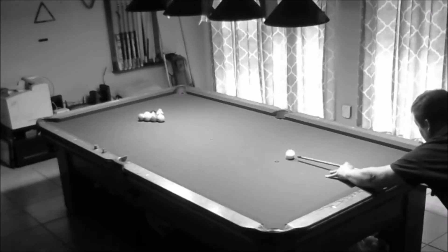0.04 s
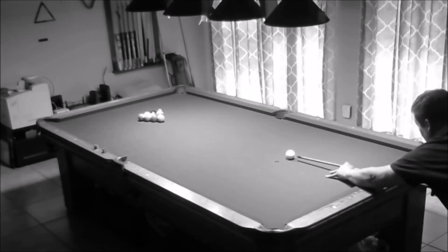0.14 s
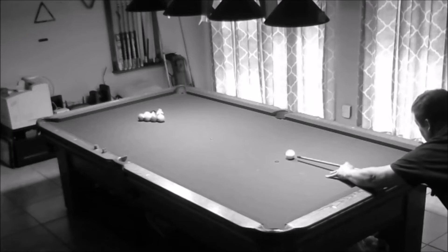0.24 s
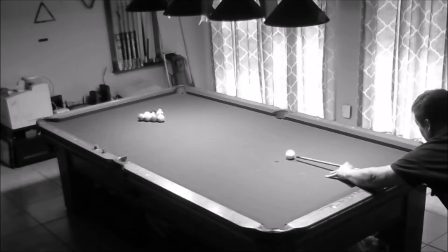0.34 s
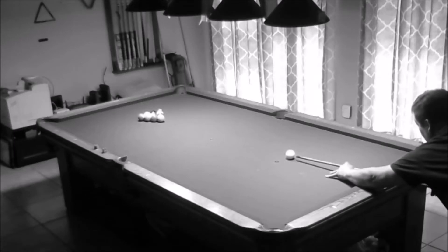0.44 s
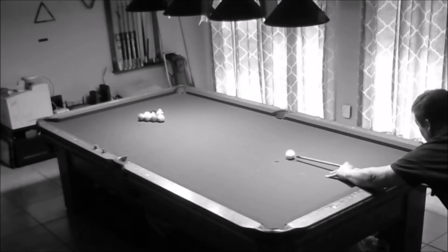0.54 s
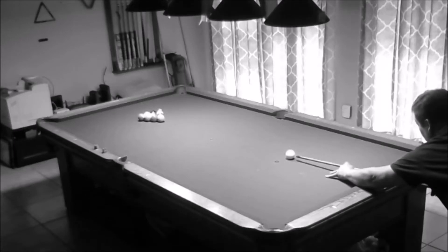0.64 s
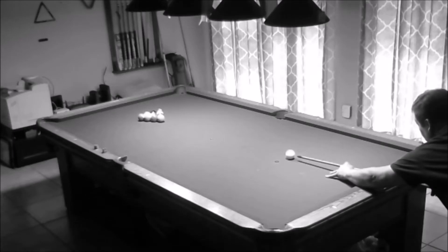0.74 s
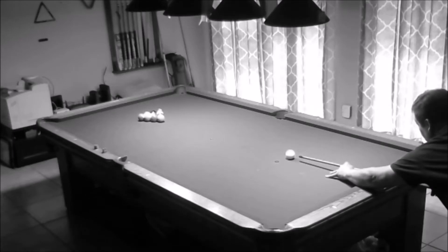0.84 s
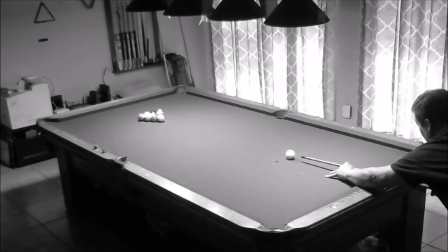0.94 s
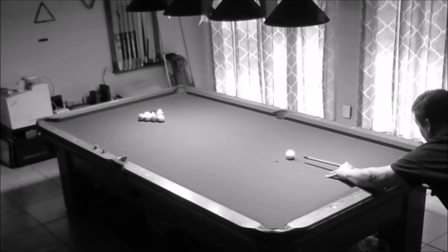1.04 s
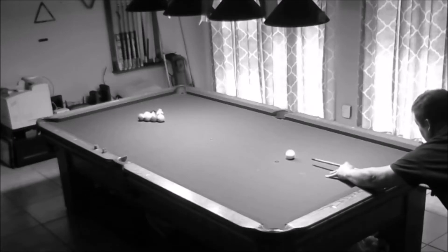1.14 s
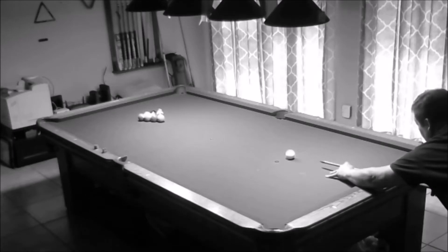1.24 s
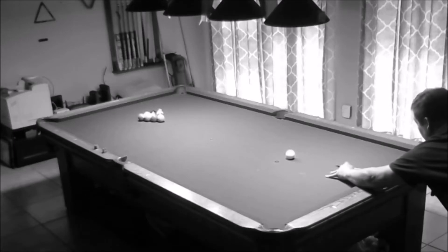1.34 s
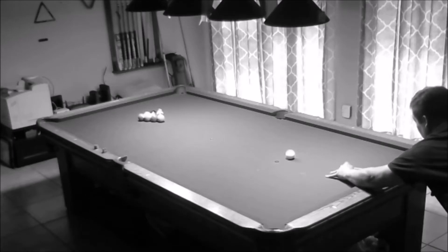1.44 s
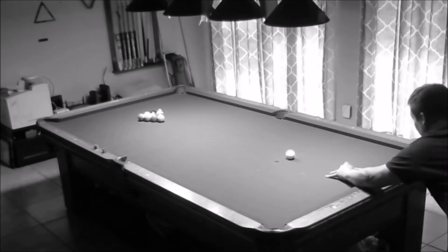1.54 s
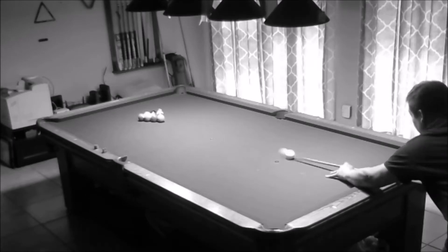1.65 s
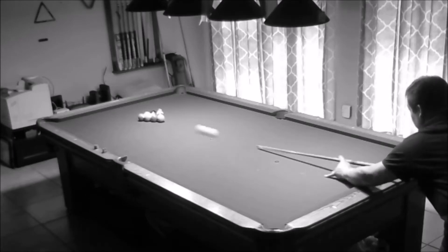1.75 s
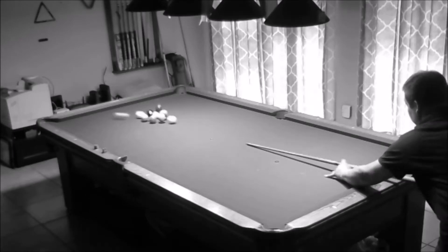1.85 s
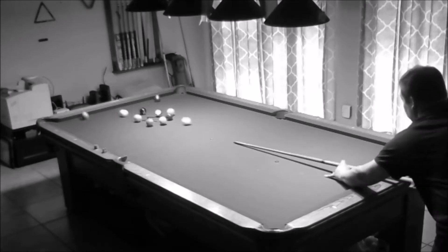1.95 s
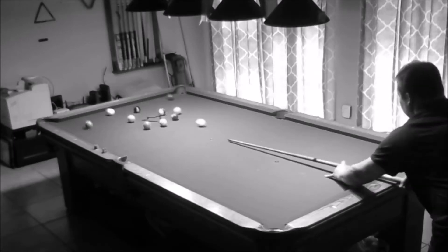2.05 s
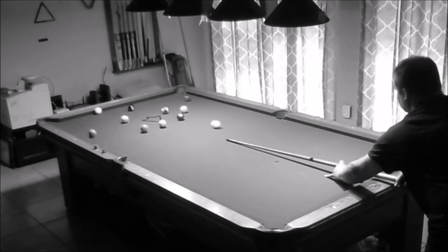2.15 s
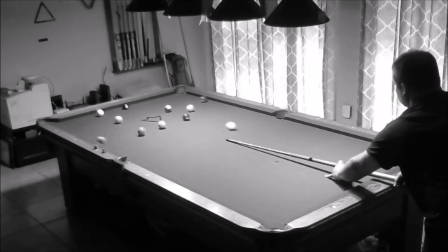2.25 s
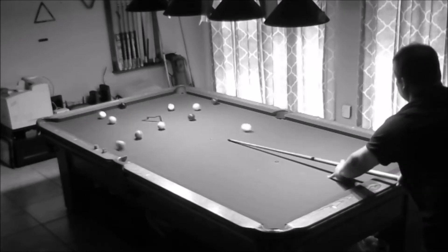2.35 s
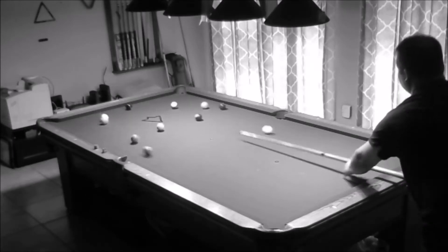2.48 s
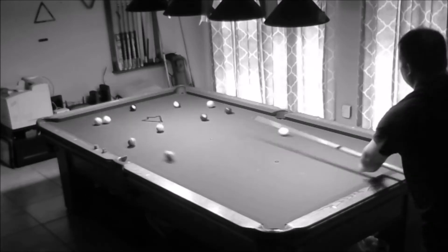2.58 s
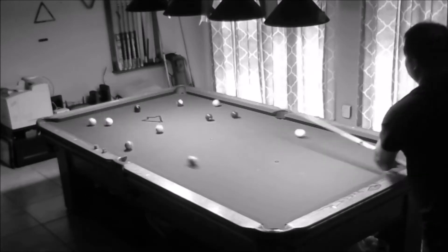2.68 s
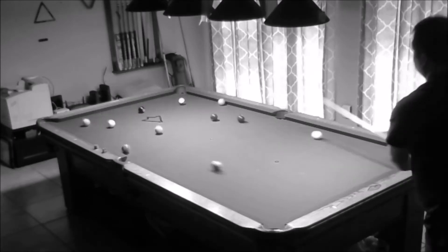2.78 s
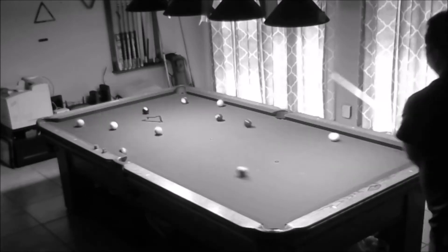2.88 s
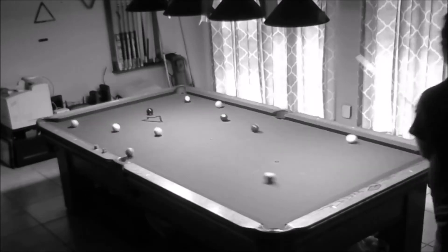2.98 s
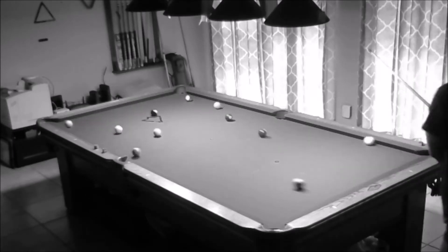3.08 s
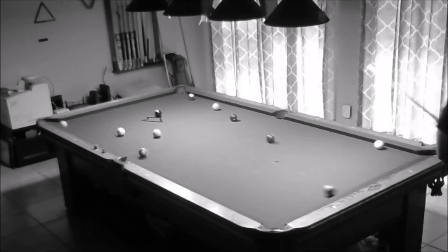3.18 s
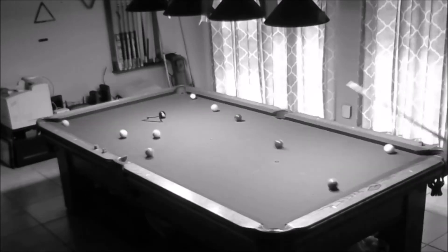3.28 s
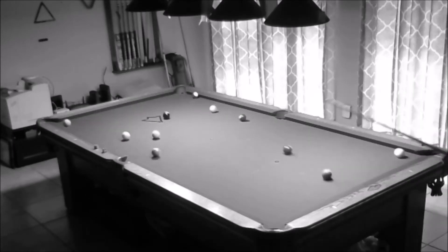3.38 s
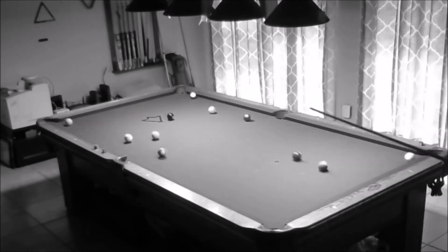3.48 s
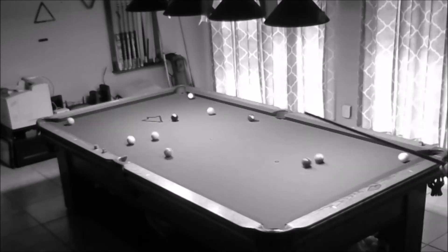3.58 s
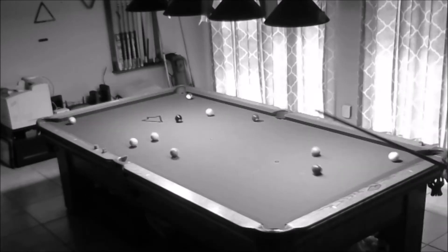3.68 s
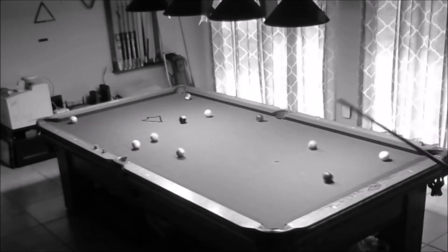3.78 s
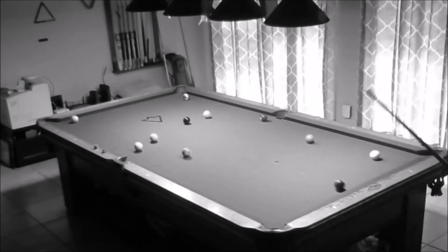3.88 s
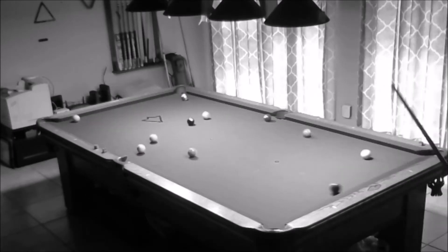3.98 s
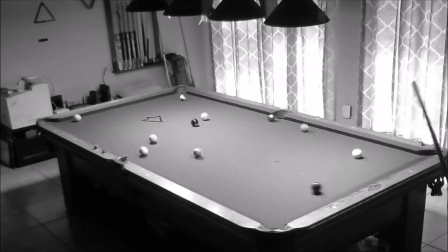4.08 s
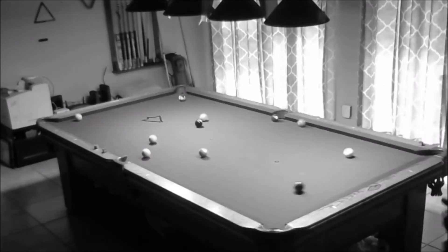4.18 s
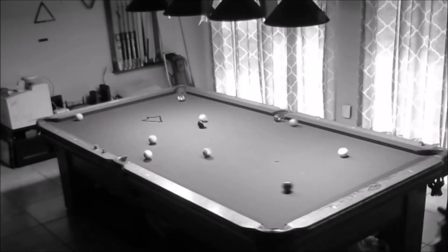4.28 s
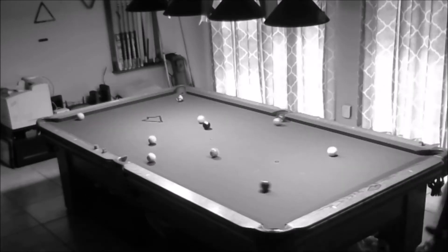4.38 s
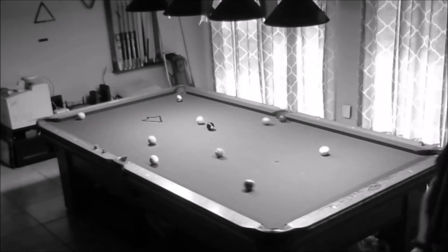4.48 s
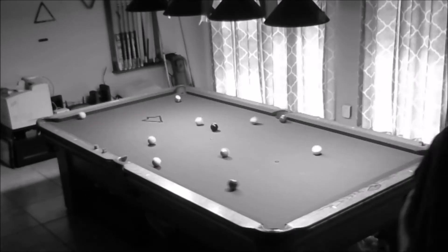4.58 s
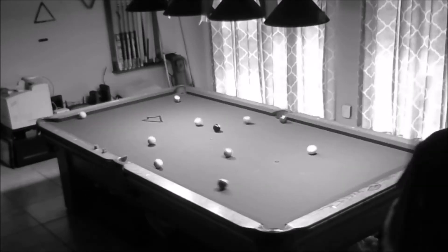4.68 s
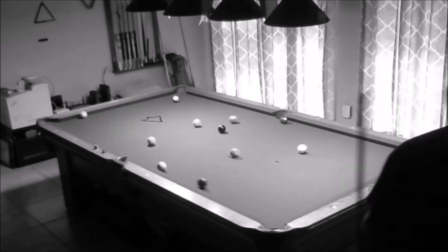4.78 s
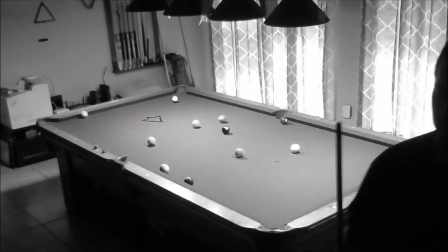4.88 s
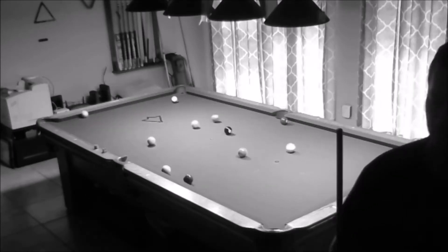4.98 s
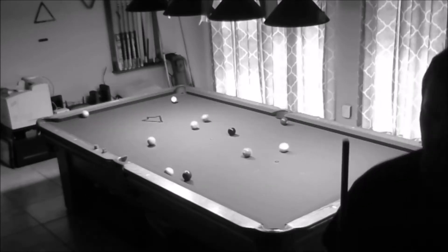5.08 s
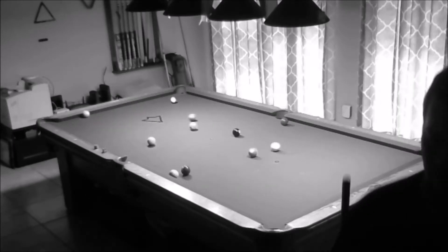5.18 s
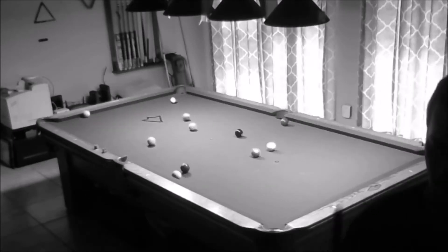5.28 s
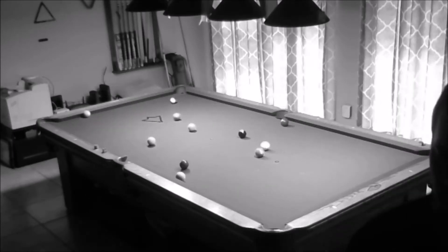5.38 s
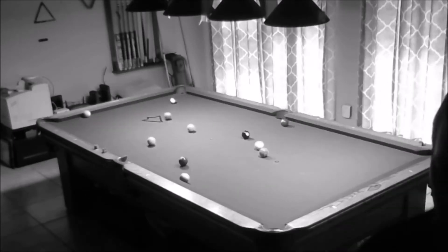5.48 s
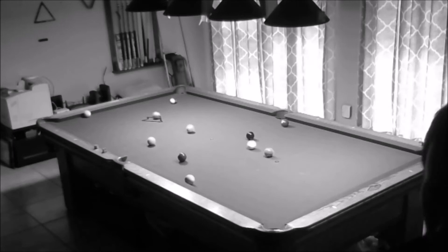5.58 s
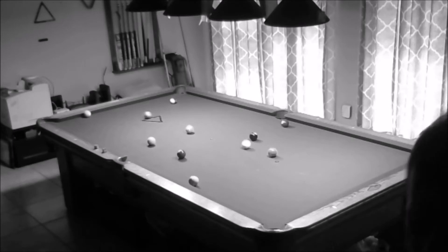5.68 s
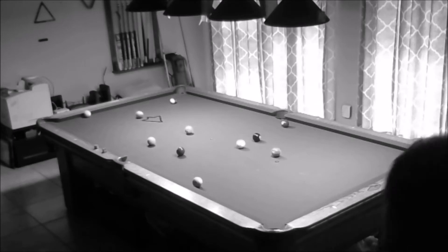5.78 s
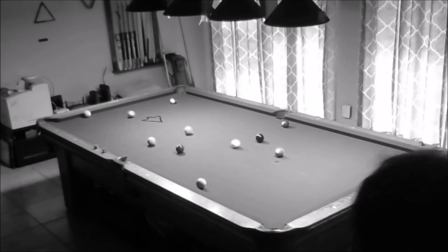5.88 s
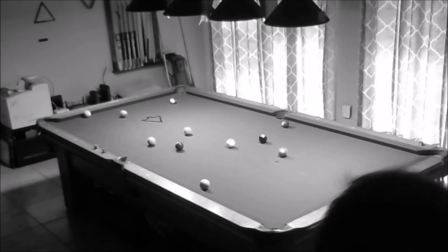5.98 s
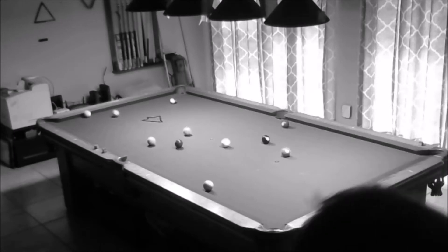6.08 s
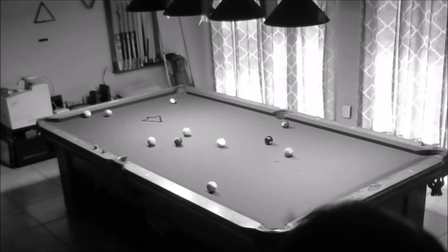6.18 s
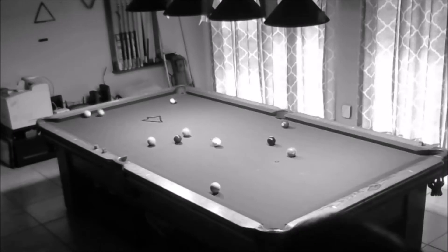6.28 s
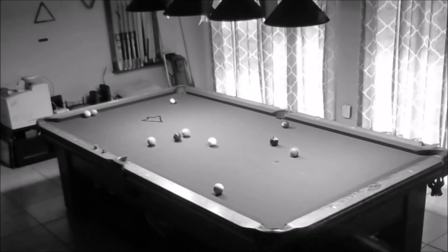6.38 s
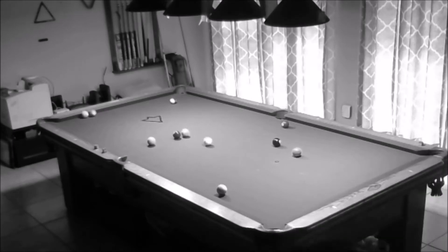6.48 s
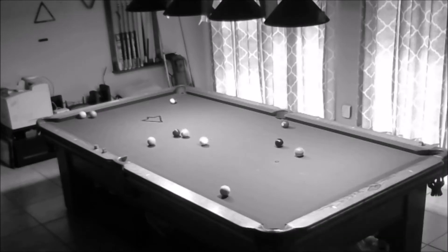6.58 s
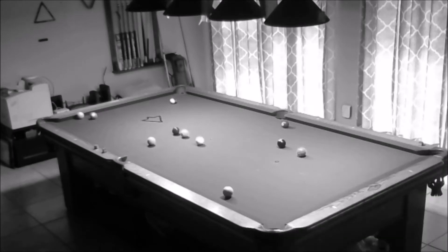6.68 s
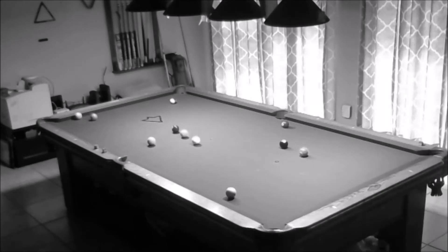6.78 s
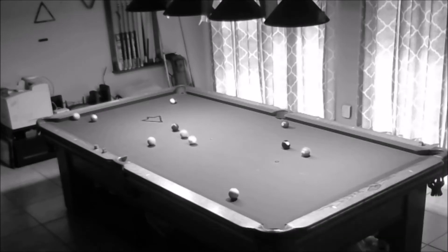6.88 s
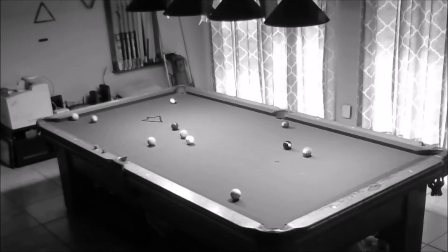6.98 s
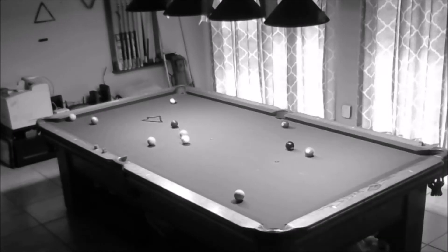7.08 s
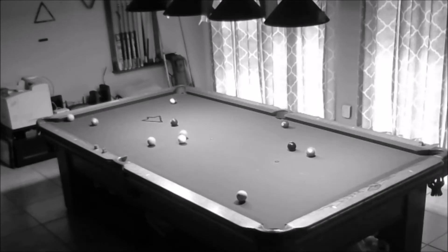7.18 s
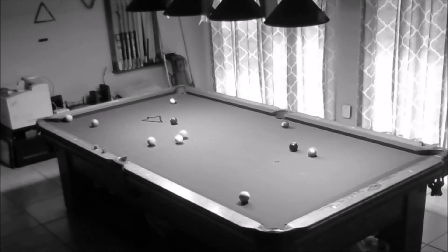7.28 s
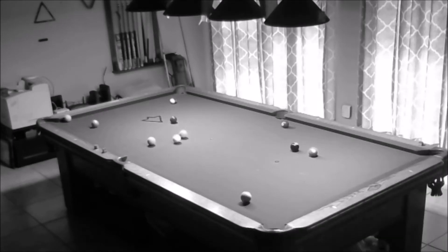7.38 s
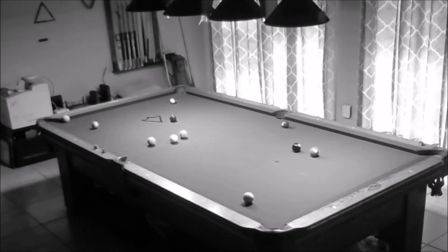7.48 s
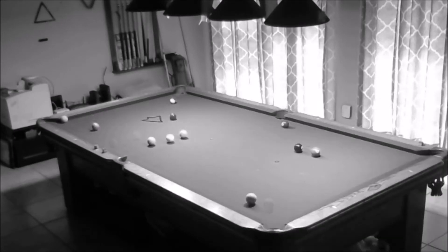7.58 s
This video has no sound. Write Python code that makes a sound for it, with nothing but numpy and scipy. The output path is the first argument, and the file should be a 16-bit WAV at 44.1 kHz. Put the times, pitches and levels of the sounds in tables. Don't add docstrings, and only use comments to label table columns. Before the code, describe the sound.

A cue strikes hard and racked pool balls burst apart in a loud distorted clack, then near-quiet with microphone flutters and a few late ball clicks.

```python
import sys
import numpy as np
from scipy import signal
from scipy.fft import rfft, irfft
from scipy.io import wavfile
from scipy.ndimage import uniform_filter1d, map_coordinates

SR = 44100
rng = np.random.default_rng(int(sys.argv[2]) if len(sys.argv) > 2 else 0)


def wav_record(signal):
    frames = np.transpose(np.atleast_2d(signal))
    bounded = np.clip(frames, -1, 1)
    quanta = np.round(bounded * 32767).astype(np.int16)
    wavfile.write(sys.argv[1], SR, quanta)


def level_to_linear(level):
    exponent = np.asarray(level, float) / 20
    return 10 ** exponent


N = 336924

# (time [s], level [dB])
CUE_BLOWS = [
    (1.6482, 3),
    (1.65, -2.5),
    (1.6602, 2),
    (1.668, -3),
    (1.6761, -3.5),
    (1.682, -2.5),
    (1.691, -2.5),
    (1.696, -7.5),
]
# (time [s], level [dB], ring [Hz], decay to -60 dB [s])
LEAD_BALL_CLACK = (1.8073, 15, 2900, 0.018)
# (time [s], level [dB])
RACK_COLLISIONS = [(1.8066, 7), (1.816, 6.5), (1.820, 6), (1.825, 4.5), (1.834, 6), (1.838, 2.5),
                   (1.844, -2.5), (1.851, 1), (1.859, -3.5), (1.865, -0.5), (1.870, -2), (1.876, -3),
                   (1.930, -11), (1.975, -14)]
# (time [s], level [dB])
CUSHION_THUDS = [(1.655, -20.5), (1.699, -25.5), (1.756, -23.5), (1.812, -20.5), (1.844, -24.5),
                 (1.922, -15.5), (1.955, -15), (1.995, -19), (2.04, -24.5), (2.065, -31.5), (2.12, -35.5)]
# (time [s], level [dB], centre [Hz], spread [octaves], share of room tail kept [0-1])
LATE_CLICKS = [(3.858, -53, 4574, 0.76, 0.42), (3.871, -51.5, 6000, 0.43, 0.52),
               (4.715, -43, 4770, 0.31, 0.03), (4.723, -49, 4560, 0.65, 0.46),
               (4.725, -57, 2900, 0.48, 0.07), (6.2017, -27.5, 3530, 1.35, 0.43),
               (6.206, -36.5, 486, 0.45, .4), (6.208, -47, 1144, 1, 0.54),
               (6.2637, -35.5, 5260, 1.23, 0.39), (6.269, -42, 422, 0.44, 0.37),
               (6.273, -52.5, 1190, 1.1, 0.32), (6.416, -61.5, 2590, 0.24, 0.63),
               (6.452, -53, 1700, 0.19, 0)]
# (time [s], level [dB], centre [Hz])
DRAUGHT_LUMPS = [
    (2.388, -55, 383),
    (3.29, -46, 379),
    (3.617, -46.5, 277),
    (5.518, -45.5, 352),
    (5.653, -50.5, 330),
    (7.03, -64, 520),
    (7.15, -62, 497),
]
# (time [s], level [dB], centre [Hz], spread [octaves], half length [s])
RUBS = [(0.435, -71, 3930, 0.18, 0.012), (1.39, -67, 6200, .3, 0.0098), (2.885, -55, 5460, 0.59, 0.013),
        (3.27, -77, 6000, 0.55, 0.026), (3.83, -62, 6010, 0.29, 0.016), (4.705, -64, 4495, 0.59, 0.0077),
        (4.78, -77, 8980, .3, .015), (5.355, -64, 6000, .4, 0.018), (5.375, -63.5, 3073, 0.27, 0.019),
        (6.195, -70, 5000, 0.48, 0.0032), (6.44, -48.5, 1906, 0.52, 0.013),
        (6.479, -56.5, 1664, 0.47, 0.024), (7.1, -69, 1200, 0.22, 0.017)]
# (time [s], level [dB], centre [Hz])
LONG_GUSTS = [
    (.11, -56, 140),
    (.47, -50, 120),
    (0.631, -41, 133),
    (1.5, -46, 150),
    (4.09, -35.5, 189.6),
    (5.13, -37.5, 90),
    (5.911, -44.5, 119.7),
    (5.96, -51.5, 170.6),
    (6.3, -61, 141.4),
    (6.584, -43, 130.2),
]
# (time [s], peak [dB], centre [Hz], half length [s])
STRONG_EDDIES = [(0.406, -41.5, 142, 0.0065), (0.579, -47.5, 125, 0.012), (0.668, -34, 119, 0.0062),
                 (0.896, -34.5, 144, 0.0079), (1.081, -25, 131, 0.0038), (1.469, -30.5, 133, 0.014),
                 (2.36, -39, 145.2, 0.0086), (2.8, -42, 143.8, 0.0073), (2.948, -42.5, 253.4, 0.011),
                 (3.116, -28.5, 142, 0.0042), (3.143, -30, 127.8, 0.0071), (3.311, -40.5, 149, 0.016),
                 (3.591, -27, 144.8, 0.0049), (3.986, -43, 152, 0.006), (4.058, -14.5, 150, 0.0033),
                 (4.629, -24.5, 145.6, 0.0041), (4.685, -39, 116, 0.005), (4.74, -28, 147.4, 0.011),
                 (4.769, -30.5, 167, 0.011), (4.829, -36.5, 116, 0.00807), (4.935, -36, 205.3, 0.0046),
                 (5.143, -22.5, 160.6, 0.005), (5.245, -40.5, 169, 0.0056), (5.515, -27, 164, 0.005),
                 (5.645, -23, 141, 0.0051), (5.931, -28.5, 124.8, 0.0064), (6.123, -28, 142.7, 0.0044),
                 (6.564, -28.5, 167.9, 0.0086), (6.762, -36, 140, 0.0062), (6.922, -41, 104.6, 0.0073)]
# (time [s], level [dB])
DRAUGHT_STRENGTH = [(0.0, -54.5), (0.33, -63.5), (0.57, -58), (1.0, -57), (1.3, -65), (1.6, -56.5),
                    (2.45, -60), (2.99, -59.5), (3.23, -54.5), (3.66, -60), (4.03, -57.5), (4.4, -61.5),
                    (4.78, -56), (5.3, -60.5), (6.15, -61.5), (6.9, -58.5), (7.3, -66.5), (7.64, -60.5)]
# (time [s], gain [dB])
ROOM_TONE_GAIN = [
    (6.15, 0.4),
    (6.9, -1),
    (7.3, -3.5),
    (7.64, -3),
]

# (frequency [Hz], level [dB])
TIP_COLOUR = [(300, -32.5), (700, -11), (1400, -11.5), (2200, -14.5), (3000, -8), (4300, -4), (6000, -7),
              (7200, -8), (7700, -20.5), (11000, -32.5), (16000, -50.5)]
BALL_COLOUR = [(300, -34.5), (800, -11.5), (1500, -3), (2200, 2), (2900, -1), (4000, -10.5), (6000, -21),
               (8000, -36), (11000, -57.5), (16000, -78.5)]
RUBBER_COLOUR = [(60, -21), (150, -11.5), (250, -11.5), (400, -1.5), (550, -3.5), (900, -10.5),
                 (2000, -55.5)]
DRAUGHT_COLOUR = [(25, -33), (60, -3.5), (120, -2), (250, -3), (450, -9.5), (700, -19.5), (1500, -62.5)]
HUM_COLOUR = [(300, -19.5), (700, 3.5), (1300, -2), (2000, -7), (3000, -10), (4500, -34.5)]
HISS_COLOUR = [(2000, -23), (3500, -2), (6000, -1), (7300, -8), (8200, -17.5), (12000, -22), (15500, -23.5)]
# (frequency [Hz], gain [dB])
CLICK_TOP_LOSS = [(7000, 3), (9000, -10), (12000, -31), (16000, -40.5)]
# (frequency [Hz], gain [dB])
MEMBRANE_RESPONSE = [(20, -37), (45, -6.5), (70, -1.5), (350, -0.5), (600, -10), (1000, -57), (2000, -120)]
# (frequency [Hz], decay to -60 dB [s])
ROOM_DECAY = [(200, .7), (1000, .65), (3000, 0.54), (6000, .45), (12000, .25)]
# (frequency [Hz], threshold [dB])
SUPPRESS_THRESHOLD = [(200, -39), (1000, -35.5), (3000, -46.5), (6000, -55), (12000, -60.5)]


def unit(x):
    return x / np.sqrt(np.mean(x ** 2) + 1e-20)


def along(points, hz):
    f, v = np.transpose(points)
    return np.interp(np.log(hz + 1), np.log(f + 1), v)


def curve(rows, s):
    return np.interp(s, *np.transpose(rows))


def shape(points):
    return lambda hz: level_to_linear(along(points, hz))


def bell(centre_hz, octaves):
    return lambda hz: 1 / (1 + (np.log2(hz / centre_hz) / octaves) ** 2) ** 2


def noise(n, gain):
    spectrum = rfft(rng.standard_normal(n))
    return unit(irfft(spectrum * gain(np.fft.rfftfreq(n, 1 / SR) + 1), n))


def add(track, s, x):
    part = track[round(s * SR):][:len(x)]
    part += x[:len(part)]


def hit(gain, rise, t60, room_db, kept=1):
    t = np.arange(SR) / SR
    burst = noise(SR, gain) * (1 - np.exp(-t / rise)) ** 2 * level_to_linear(-60 * t / t60)
    hz, at, z = signal.stft(noise(SR, gain), SR, nperseg=256)
    decay = level_to_linear(-60 * at / (kept * along(ROOM_DECAY, hz)[:, None]))
    tail = signal.istft(z * decay, SR, nperseg=256)[1][:SR]
    build_up = (1 - np.exp(-t / 0.0044)) ** 2
    return burst + level_to_linear(room_db) * tail * build_up


def break_shot():
    out = np.zeros(N)
    t = np.arange(SR // 10) / SR
    s, db, hz, t60 = LEAD_BALL_CLACK
    add(out, s, level_to_linear(db - 60 * t / t60) * np.sin(2 * np.pi * hz * t))
    for s, db in CUE_BLOWS:
        add(out, s, level_to_linear(db) * hit(shape(TIP_COLOUR), rise=0.0013, t60=0.027, room_db=-19.5))
    for s, db in RACK_COLLISIONS:
        add(out, s, level_to_linear(db) * hit(shape(BALL_COLOUR), rise=0.0012, t60=0.04, room_db=-17))
    for s, db in CUSHION_THUDS:
        add(out, s, level_to_linear(db) * hit(shape(RUBBER_COLOUR), rise=0.0043, t60=0.16, room_db=-7.0, kept=0.62))
    return out


def suppressed(x):
    hz, _, z = signal.stft(x, SR, nperseg=512)
    across_bands = uniform_filter1d(abs(z) ** 2, size=9, axis=0)
    power = abs(uniform_filter1d(across_bands, size=3, axis=1))
    threshold = level_to_linear(2 * along(SUPPRESS_THRESHOLD, hz) - 39.5)[:, None]
    keep = power / (power + threshold)
    steepness = 2.2
    return signal.istft(z * keep ** steepness, SR, nperseg=512)[1][:N]


def late_clicks():
    out = np.zeros(N)
    for s, db, hz, octaves, kept in LATE_CLICKS:
        gain = lambda f: bell(hz, octaves)(f) * shape(CLICK_TOP_LOSS)(f)
        add(out, s, level_to_linear(db) * hit(gain, rise=0.000929, t60=0.08, room_db=-2.5, kept=max(kept, 0.05)))
    return out


def soft_swells():
    out = np.zeros(N)
    t = np.arange(SR // 5) / SR - 0.1
    lump_octaves, lump_half_s = 0.34, 0.013
    gust_octaves, gust_half_s = 0.5, 0.014
    draught_lumps = [(*row, lump_octaves, lump_half_s) for row in DRAUGHT_LUMPS]
    gusts = [(*row, gust_octaves, gust_half_s) for row in LONG_GUSTS]
    for s, db, hz, octaves, half in RUBS + draught_lumps + gusts:
        swell = np.exp(-0.5 * (t / half) ** 2)
        add(out, s + t[0], level_to_linear(db) * noise(len(t), bell(hz, octaves)) * swell)
    return out


def puffs():
    out = np.zeros(N)
    t = np.arange(SR // 4) / SR - 0.03
    for s, db, hz, half in STRONG_EDDIES + small_eddies():
        push = np.sin(2 * np.pi * (hz * t + rng.random())) * np.exp(-0.5 * (t / (0.47 * half)) ** 2)
        swell = np.exp(-abs(t) / np.where(t < 0, 0.51 * half, 3.5 * half))
        flutter = 0.19 * swell * noise(len(t), bell(hz, 0.99))
        add(out, max(s + t[0], 0), level_to_linear(db + 1.0) * (push + flutter))
    return irfft(rfft(out) * shape(MEMBRANE_RESPONSE)(np.fft.rfftfreq(N, 1 / SR)), N)


def small_eddies():
    count = 70
    draw = rng.standard_normal((count, 4))
    spots = (np.arange(count) + 0.5 + draw[:, 0] / 4) / count
    s = np.clip(spots * N / SR, 0.05, None)
    db = curve(DRAUGHT_STRENGTH, s) + 8 + 4 * draw[:, 1]
    hz = 150 * 2 ** (0.3 * draw[:, 2])
    half_s = 0.005994 * 0.9 ** draw[:, 3]
    return list(zip(s, db, hz, half_s))


def air():
    t = np.arange(N) / SR
    lumps = map_coordinates(rng.standard_normal(400), [t * 25])
    lumpy = unit(level_to_linear(3.5 * lumps) * noise(N, shape(DRAUGHT_COLOUR)))
    rumble = level_to_linear(curve(DRAUGHT_STRENGTH, t)) * lumpy
    hum = level_to_linear(-68.5) * noise(N, shape(HUM_COLOUR))
    hiss = level_to_linear(-76.5) * noise(N, shape(HISS_COLOUR))
    return rumble + level_to_linear(curve(ROOM_TONE_GAIN, t)) * (hum + hiss)


def scene():
    return (suppressed(break_shot()) + late_clicks() + soft_swells() + puffs() + air())[None]


def top_cut(x):
    return signal.sosfilt(signal.butter(12, 15800, fs=SR, output="sos"), x)


def record(dry):
    lag_samples, aligned_s = 31, 7.55
    held = dry / (1 + (abs(signal.hilbert(dry)) / 1.59) ** 20) ** (1 / 20)
    port = np.clip(held, -1.05, 1.05)
    late = np.pad(port, ((0, 0), (lag_samples, 0)))[:, :N]
    aligned = np.clip((np.arange(N) / SR - aligned_s) / 0.02, 0, 1)
    both = 0.59 * (port + 0.92 * late) * (1 - aligned) + 1.27 * port * aligned
    rolled = signal.lfilter(*signal.butter(2, 45, "high", fs=SR), both)
    return top_cut(np.clip(rolled, -0.95, 0.95))


dry = scene()
out = record(dry)
wav_record(out)
```